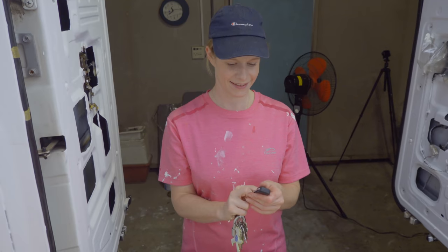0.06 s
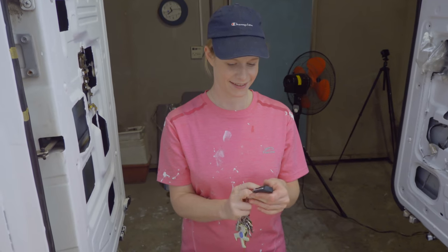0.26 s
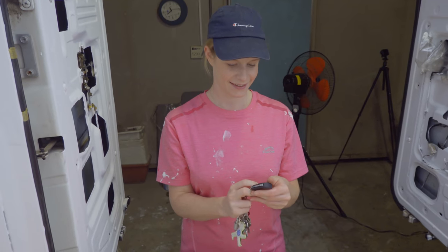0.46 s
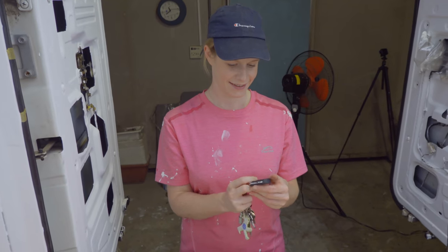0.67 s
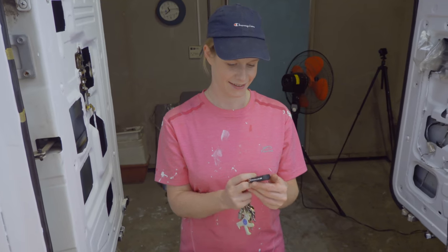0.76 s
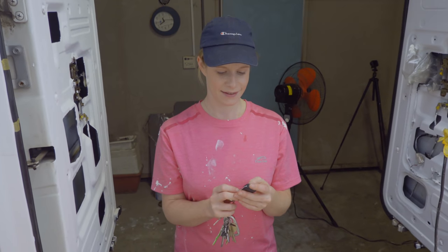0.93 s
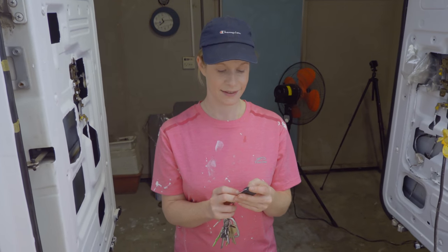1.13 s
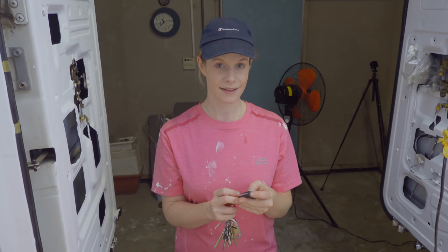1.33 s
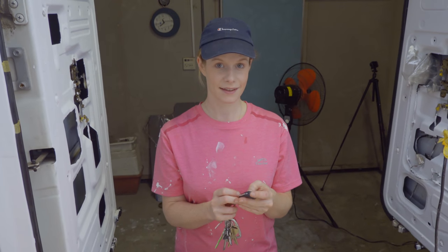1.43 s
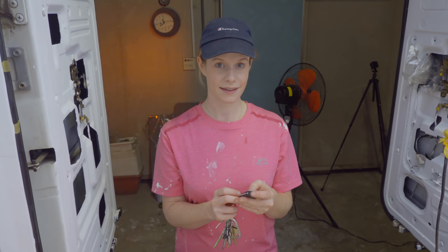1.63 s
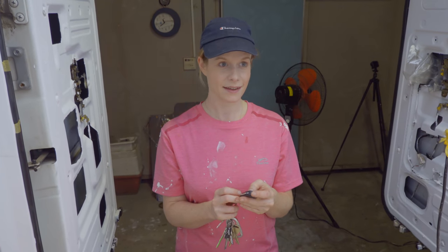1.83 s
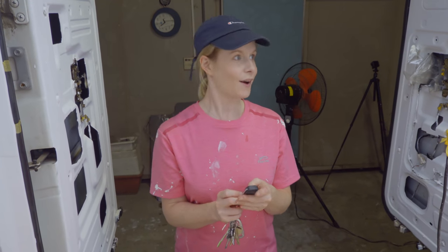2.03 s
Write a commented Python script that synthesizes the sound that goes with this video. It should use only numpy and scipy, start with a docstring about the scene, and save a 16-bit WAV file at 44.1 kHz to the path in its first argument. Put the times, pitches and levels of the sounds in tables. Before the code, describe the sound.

Van door locks clunk and whirr twice after a key fob clicks in a garage.

```python
"""Van door lock actuators whirr and clunk twice in a garage workshop: small motors grind their gears
into the sheet-metal doors and the latches knock. Before them a plastic key fob snaps; keys on its ring
clink before and between the lock runs. The hard room rings on over a deep rumble and faint hiss."""
import sys
import numpy as np
from scipy import signal
from scipy.fft import rfft, irfft
from scipy.io import wavfile
from scipy.ndimage import uniform_filter1d

SR = 44100
rng = np.random.default_rng(int(sys.argv[2]) if len(sys.argv) > 2 else 0)


def store_pcm(level_fs):
    """Save levels as 16-bit WAV."""
    pcm = np.round(np.clip(level_fs, -1, 1) * 32767).astype(np.int16)
    wavfile.write(sys.argv[1], SR, np.atleast_2d(pcm).T)


N = 92433
BASS_HZ = 350


def lock_motors():
    """Gear teeth chatter into the door; the motor whines while it runs."""
    # per run: (time [s], level [dB], treble [dB], bass [dB], whine [dB], whine pitch [Hz])
    runs = [
        [(1.472, -34, -5, -20, -12, 3300), (1.482, -18.5, 9, -20, -1.5, 3400),
         (1.52, -15.5, -13, -10, -18, 3900), (1.55, -12, -31, -1, -16.5, 4700), (1.6, -12.5, -7, 2, -20, 4680),
         (1.665, -12.5, -6, -2.5, -21, 4650), (1.69, -25.5, -2.5, 11.5, -15, 4600)],
        [(1.996, -37.5, -3, -16, -4, 3300), (2.012, -26.5, -0.5, -2, -16, 3600),
         (2.04, -24, -6.5, 1, -17, 4700), (2.07, -29.5, -12, 5.5, -18, 4700), (2.1, -26, -4, 6, -22, 4700)],
    ]
    tooth_rate_hz, scatter_db, treble_hz, whine_width_hz = 5000, 2, 1500, 270
    t = np.arange(N) / SR
    impacts = rng.random(N) < tooth_rate_hz / SR
    teeth = impacts * undb(scatter_db * rng.exponential(size=N)) * rng.standard_normal(N)
    grind = level(door(teeth), 0)
    bass = signal.lfilter(*signal.butter(2, BASS_HZ, fs=SR), grind)
    treble = signal.lfilter(*signal.butter(1, treble_hz, "high", fs=SR), grind - bass)
    mid = grind - bass - treble
    flutter = signal.lfilter(*signal.butter(2, whine_width_hz / 2, fs=SR), rng.standard_normal(N))
    out = np.zeros(N)
    for run in runs:
        times_s, db, *layers_db, whine_hz = np.array(run).T
        phase = 2 * np.pi * np.cumsum(np.interp(t, times_s, whine_hz)) / SR
        whine = level(flutter, 2.4) * np.sin(phase)
        treble_gain, bass_gain, whine_gain = (undb(np.interp(t, times_s, d)) for d in layers_db)
        envelope = undb(np.interp(t, times_s, db, left=-120, right=-120))
        out += envelope * (mid + treble_gain * treble + bass_gain * bass + whine_gain * whine)
    return out


def latches():
    """Latches strike the door; returns panel knocks and bright clacks."""
    # (time [s], knock [dB], clack [dB])
    strikes = [(1.4722, -18.5, -32), (1.479, -4.5, -35), (1.506, -5.5, -12), (1.517, -8.5, -24),
               (1.5395, -2, 2), (1.545, -6.5, -10), (1.999, -32, -41), (2.015, -23, -30)]
    body, clack = np.zeros((2, N))
    for start_s, knock_db, clack_db in strikes:
        add(body, start_s, undb(knock_db) * burst(t60_s=0.033))
        add(clack, start_s, undb(clack_db) * burst(t60_s=0.02))
    door_gain = np.std(door(rng.standard_normal(N)))
    knocks = signal.lfilter(*signal.butter(2, BASS_HZ, "high", fs=SR), door(body) / door_gain)
    return knocks, band(clack, hz=8320, width_hz=1630)


def door(x):
    """Sheet metal: a broad response plus its strongest modes."""
    # (frequency [Hz], level [dB])
    spectrum = [(25, -30), (50, -2.5), (120, -4), (300, -4), (600, -8), (1200, -9), (2500, -10),
                (5000, -20.5), (6500, -31), (8700, -23.5), (12000, -48.5), (16000, -43)]
    # (frequency [Hz], width [Hz], level [dB])
    modes = [(65.6, 25, -1.5), (125.3, 11, -6.5), (240, 37, -4.5), (284, 21, -1), (290.3, 25, -2.5),
             (437, 89, 3), (504, 18.5, 6), (526, 24, 8.5), (750, 36, -18), (1030, 24, -13.5),
             (1170, 16, -33), (2570, 50, -26), (3500, 600, -15.5), (7800, 140, -50)]
    broad = colour(x, spectrum) / undb(max(db for _, db in spectrum))
    rings = sum(undb(db) * band(x, hz, width_hz) for hz, width_hz, db in modes)
    return broad + undb(-0.5) * rings


def fob():
    """Each snap is a tick and a short crackle in the plastic shell."""
    # (time [s], peak [dB], tilt [dB/octave], low cut [Hz], crackle t60 [s], crackle boost [dB])
    snaps = [(.1366, -0.5, 0, 664, 0.035, 3), (1.012, -49, -5, 1400, 0.14, 24.5),
             (1.0843, -24.5, -0.5, 1550, 0.038, 13.5), (1.2889, -24, -3.5, 1510, 0.029, 18)]
    # (frequency [Hz], level [dB])
    shell = [(300, -22.5), (1000, -12.5), (1500, -6), (1950, 1), (2600, -3), (3200, -15), (3900, -7.5),
             (5000, -15.5), (6500, -19), (7800, -10.5), (9500, -20.5), (16000, -27.5)]
    crackle_base_db = -28
    out = np.zeros(N)
    for start_s, db, tilt, low_hz, t60_s, boost_db in snaps:
        push = undb(crackle_base_db + boost_db) * burst(t60_s)
        push[0] -= 1  # tick
        snap = colour(push, [(hz, d + tilt * np.log2(hz / 2000)) for hz, d in shell])
        low_cut = signal.butter(3, low_hz, "high", fs=SR, output="sos")
        add(out, start_s, peak(signal.sosfilt(low_cut, snap), db))
    return out


def keys():
    """Keys collide: a bright tick, then a rattle in narrow, high modes."""
    # (time [s], ring peak [dB], pitch [Hz], t60 [s], tick peak [dB])
    clinks = [(0.261, -32, 9680, 0.085, -34), (0.28, -35.5, 8740, 0.096, -30),
              (.436, -45, 7160, 0.025, -35), (.485, -46.5, 8900, 0.027, -51), (.694, -48, 5530, 0.046, -47),
              (0.73, -35.5, 7250, 0.032, -31), (.8695, -37, 8710, 0.046, -42),
              (0.9017, -42, 7600, 0.047, -38), (1.8101, -27.5, 6920, 0.098, -34),
              (1.827, -29.5, 7800, 0.085, -38), (1.846, -30.5, 6750, 0.058, -25),
              (1.868, -36, 7350, 0.17, -26), (2.02, -27, 8130, 0.19, -34), (2.0372, -26, 7620, 0.077, -27)]
    # (pitch ratio [1], level [dB])
    modes = [(.72, -5), (0.998, 10), (1.05, 2), (1.19, 3), (1.33, -2), (1.45, 3), (1.56, -9), (1.68, -17),
             (2.05, -10)]
    out = np.zeros(N)
    for start_s, ring_db, hz, t60_s, tick_db in clinks:
        tick = steep_band(burst(t60_s=0.005), 0.73 * hz, width_hz=9000)
        rattle = burst(t60_s)
        rings = sum(undb(db) * band(rattle, min(hz * ratio, 15500), width_hz=164) for ratio, db in modes)
        add(out, start_s, peak(rings, ring_db) + peak(tick, tick_db))
    return out


def room(x):
    """Dense echoes off bare walls; the treble dies first."""
    # (frequency [Hz], t60 [s])
    decays = [(100, 1), (300, 0.67), (1000, 0.74), (2500, 0.66), (6000, 0.56), (12000, 0.31)]
    delay_s = 0.005
    tail = sum(steep_band(rng.standard_normal(SR), hz, hz) / np.sqrt(t60_s) * fade(t60_s, length_s=1)
               for hz, t60_s in decays)
    tail /= np.sqrt(np.sum(tail ** 2))
    return signal.fftconvolve(x, np.r_[np.zeros(int(delay_s * SR)), tail])[:N]


def hiss():
    """Treble hiss and one thin, flickering band; both stop abruptly."""
    # (frequency [Hz], density [dB])
    spectrum = [(1000, 2.5), (3000, 7.5), (8000, -1), (15000, -8)]
    # (time [s], level [dB])
    contour = [(0, -55.5), (.13, -49), (.45, -62), (.63, -66), (.75, -61.5), (.937, -70)]
    end_s, release_s = 0.937, 0.002
    t = np.arange(N) / SR
    broad = steady_noise(spectrum, 0) * undb(np.interp(t, *np.array(contour).T))
    thin = steep_band(rng.standard_normal(2 * N), hz=5060, width_hz=160)[N:]
    flicker_db = drift(rate_hz=8.1)
    gate = np.clip((end_s - t) / release_s, 0, 1)
    return gate * (broad + level(thin, -67.5) * undb(flicker_db))


def background():
    """Deep rumble and steady room noise."""
    # (frequency [Hz], density [dB])
    rumble = [(5, -18), (8, 5), (20, -8.5), (30, -2.5), (50, -18.5), (80, -24), (150, -46), (300, -58)]
    # (frequency [Hz], density [dB])
    room_noise = [(40, -16), (70, -0.5), (150, -4), (400, -7), (700, -13.5), (1500, -16), (2500, -26.5),
                  (4000, -30), (8000, -37.5), (16000, -50.5)]
    return steady_noise(rumble, db=-32.5) + steady_noise(room_noise, db=-53)


def undb(db):
    return 10 ** (np.asarray(db) / 20)


def level(x, db):
    return x * undb(db) / np.sqrt(np.mean(x ** 2))


def peak(x, db):
    return x * undb(db) / np.abs(x).max()


def colour(x, spectrum):
    """Minimum-phase filter through (frequency [Hz], level [dB]) points."""
    hz, db = np.array(spectrum, float).T
    size = 2 ** 15
    log_hz = np.log(np.maximum(np.fft.rfftfreq(size, 1 / SR), 1))
    cepstrum = irfft(np.interp(log_hz, np.log(hz), db) * np.log(10) / 20)
    cepstrum[1:size // 2] *= 2
    cepstrum[size // 2 + 1:] = 0
    impulse = irfft(np.exp(rfft(cepstrum)))[:size // 2]
    return signal.fftconvolve(x, impulse)[:len(x)]


def band(x, hz, width_hz):
    """One resonance, unity gain at the centre."""
    return signal.lfilter(*signal.iirpeak(hz, hz / width_hz, fs=SR), x)


def steep_band(x, hz, width_hz):
    return band(band(x, hz, width_hz), hz, width_hz)


def add(out, start_s, x):
    i = int(start_s * SR)
    out[i:i + len(x)] += x[:N - i]


def fade(t60_s, length_s):
    return 1000. ** (-np.arange(int(length_s * SR)) / SR / t60_s)


def burst(t60_s):
    envelope = fade(t60_s, length_s=0.12)
    return envelope * rng.standard_normal(len(envelope))


def steady_noise(spectrum, db):
    return level(colour(rng.standard_normal(2 * N), spectrum)[N:], db)


def drift(rate_hz):
    """Smooth random curve, unit spread."""
    hold = int(SR / rate_hz)
    steps = np.repeat(rng.standard_normal(N // hold + 1), hold)
    smooth = uniform_filter1d(uniform_filter1d(steps, hold), hold)[:N]
    return smooth / smooth.std()


def scene():
    snaps, clinks, motors = fob(), keys(), lock_motors()
    knocks, clacks = latches()
    locks = motors + knocks
    bounce = np.roll(snaps, int(0.0016 * SR))  # echo off a nearby surface
    wet = room(undb(-2) * (locks + snaps) + undb(-11) * clacks + undb(-7.5) * clinks)
    return (locks + clacks + snaps + clinks + bounce + wet + hiss() + background())[None]


def record(dry):
    """Soft clip, then a steep low-pass."""
    ceiling, top_hz = 1.3, 16000
    low_pass = signal.ellip(12, .2, 90, top_hz, fs=SR, output="sos")
    return signal.sosfilt(low_pass, ceiling * np.tanh(dry / ceiling))


dry = scene()
out = record(dry)
store_pcm(out)
```